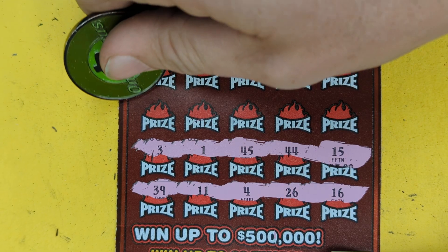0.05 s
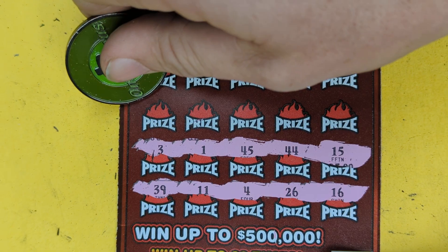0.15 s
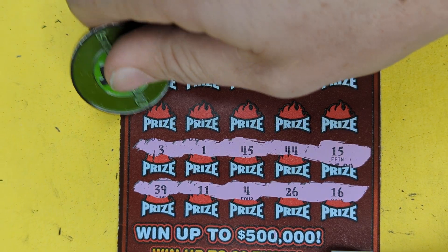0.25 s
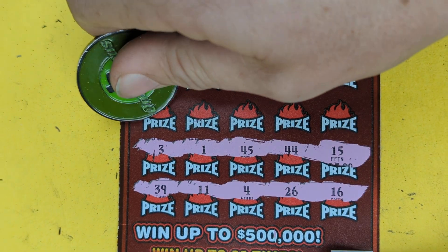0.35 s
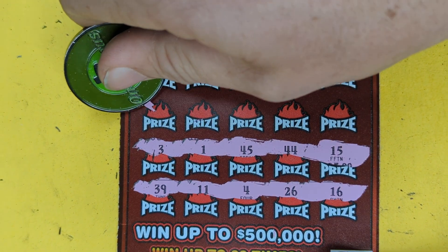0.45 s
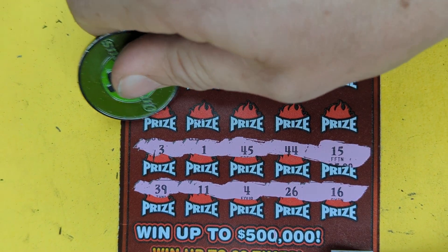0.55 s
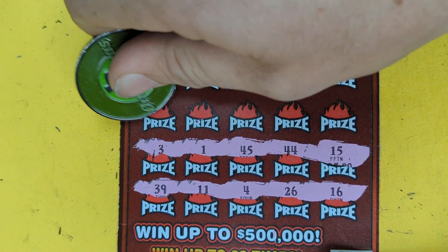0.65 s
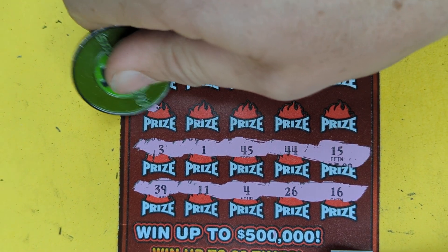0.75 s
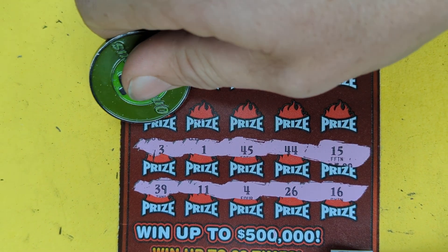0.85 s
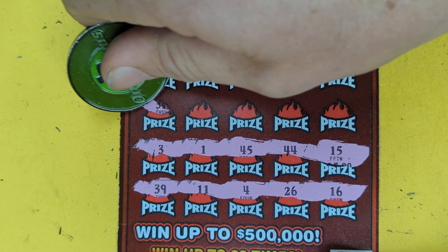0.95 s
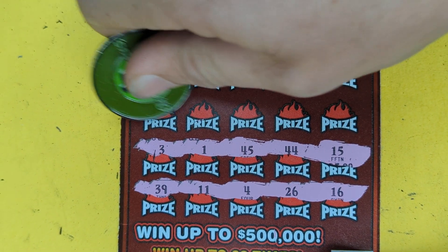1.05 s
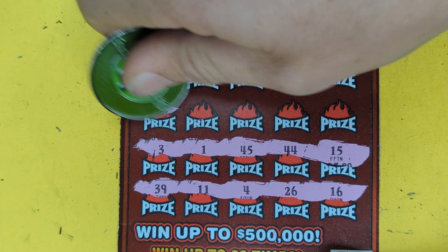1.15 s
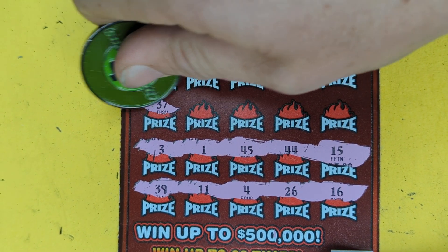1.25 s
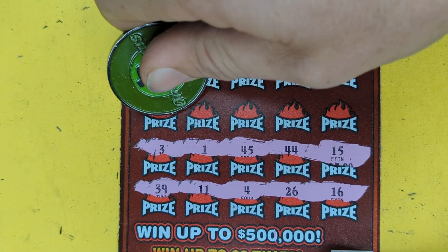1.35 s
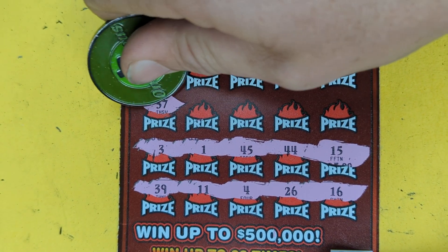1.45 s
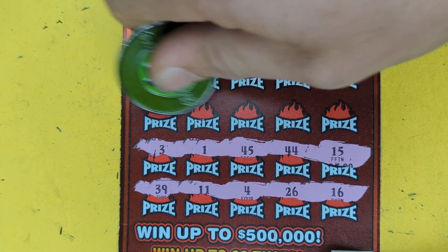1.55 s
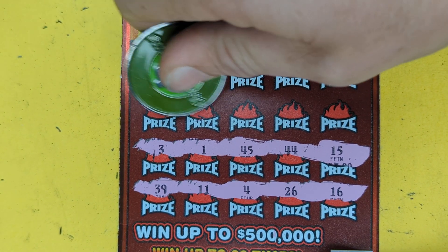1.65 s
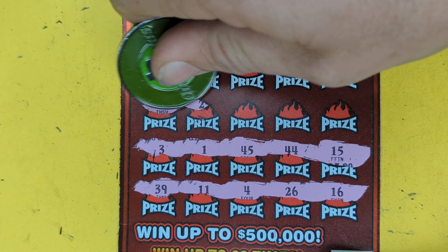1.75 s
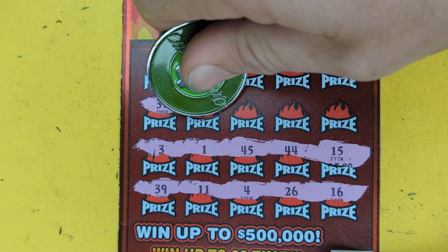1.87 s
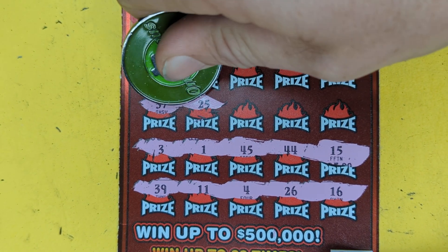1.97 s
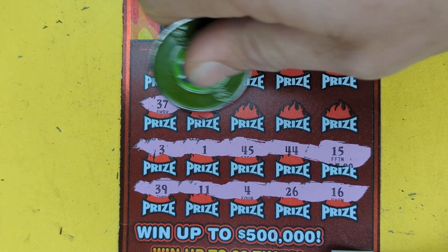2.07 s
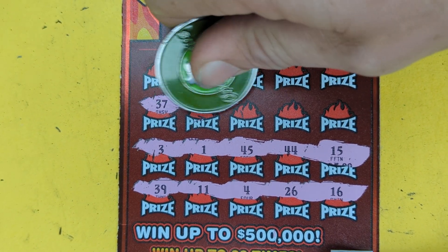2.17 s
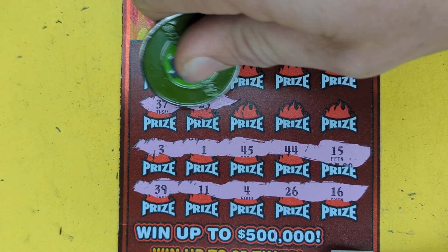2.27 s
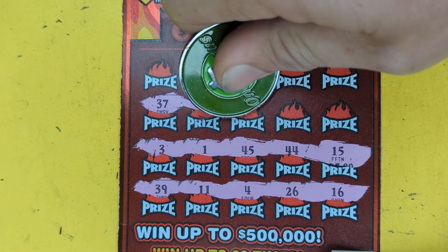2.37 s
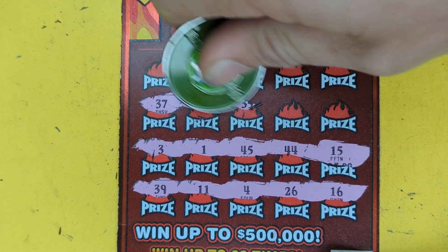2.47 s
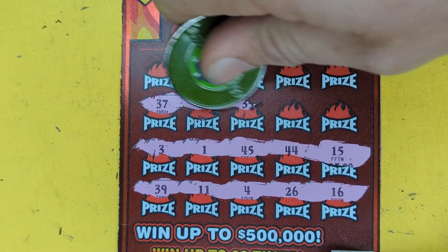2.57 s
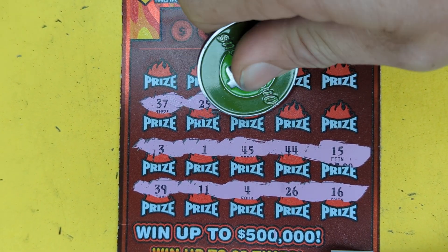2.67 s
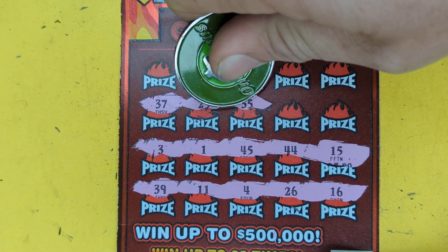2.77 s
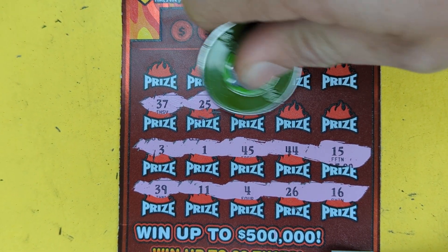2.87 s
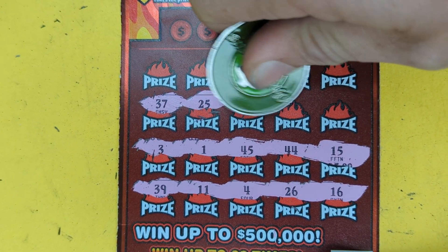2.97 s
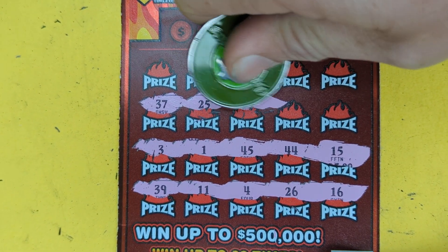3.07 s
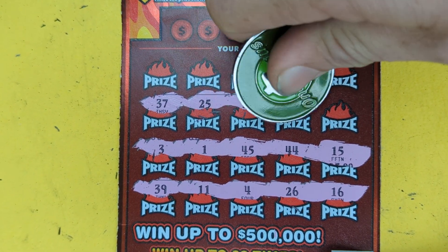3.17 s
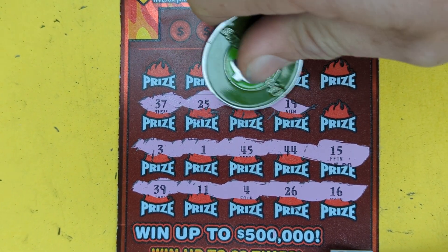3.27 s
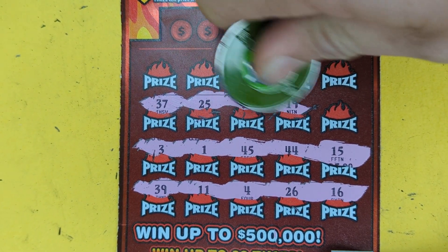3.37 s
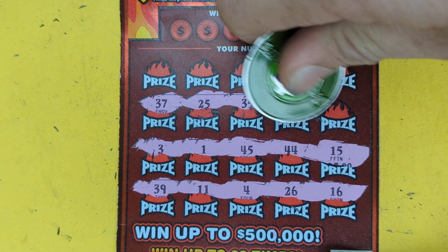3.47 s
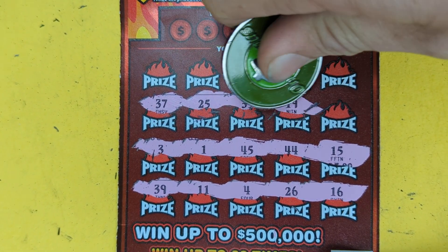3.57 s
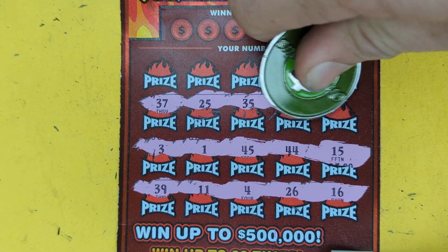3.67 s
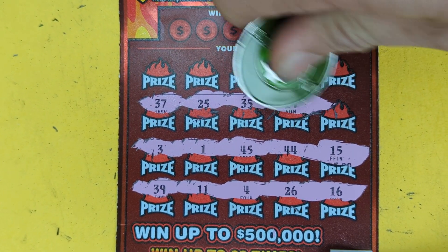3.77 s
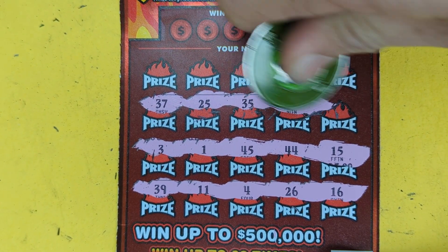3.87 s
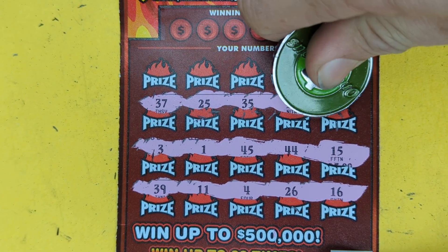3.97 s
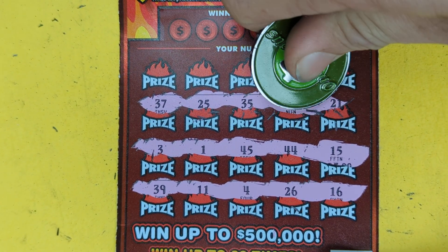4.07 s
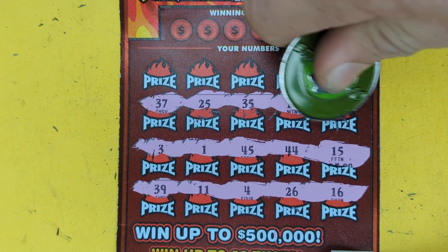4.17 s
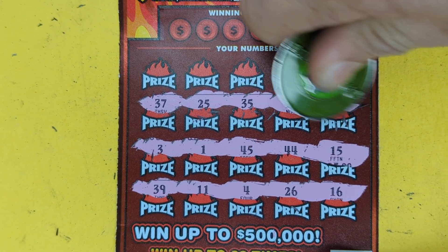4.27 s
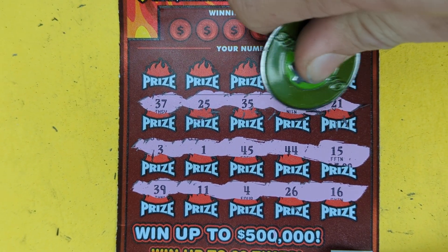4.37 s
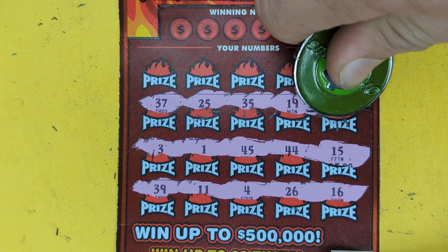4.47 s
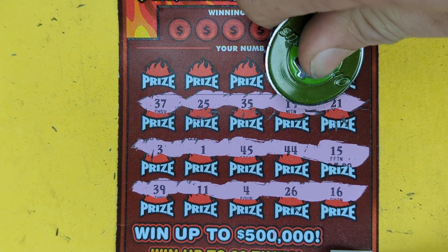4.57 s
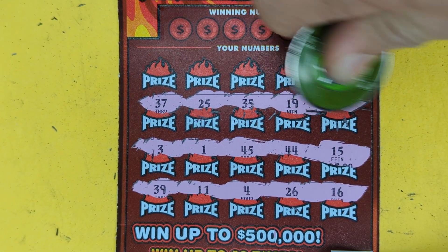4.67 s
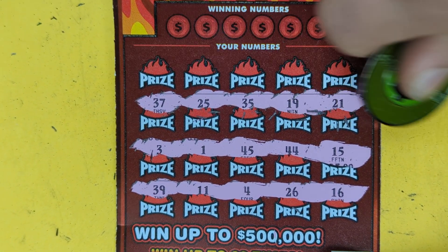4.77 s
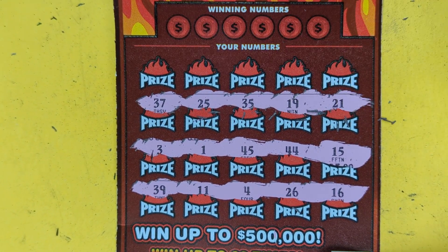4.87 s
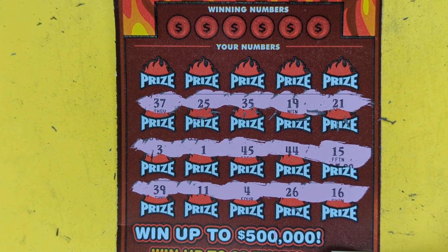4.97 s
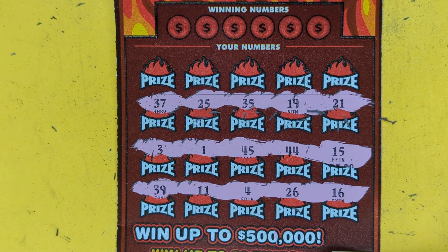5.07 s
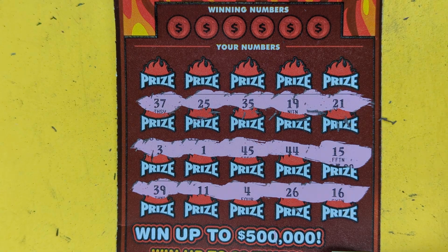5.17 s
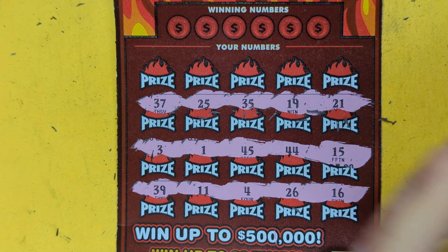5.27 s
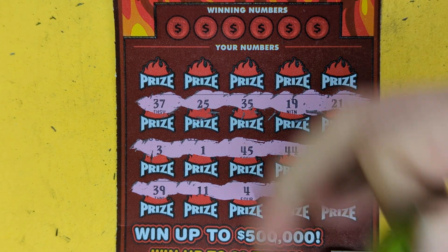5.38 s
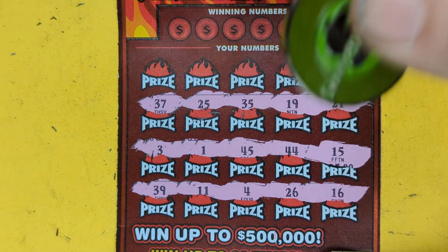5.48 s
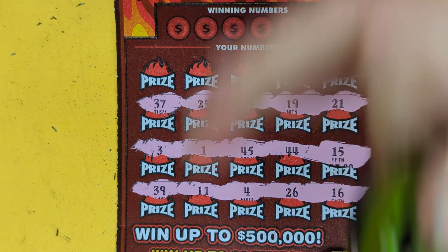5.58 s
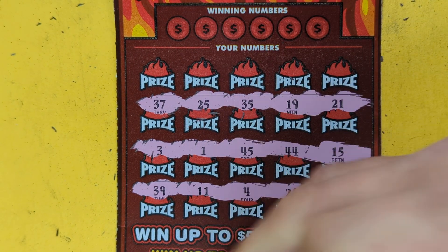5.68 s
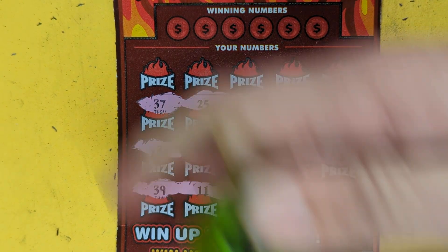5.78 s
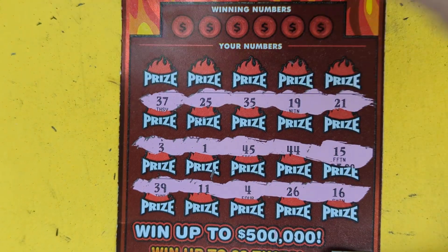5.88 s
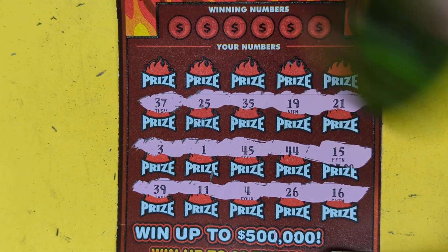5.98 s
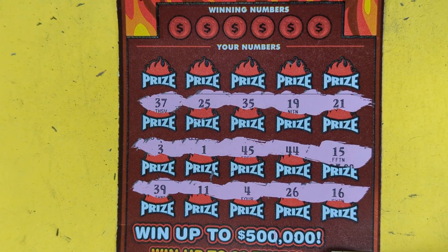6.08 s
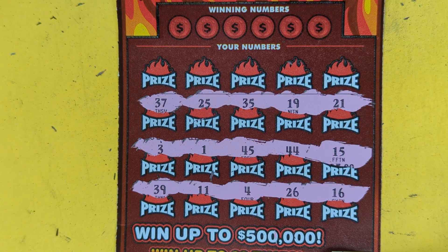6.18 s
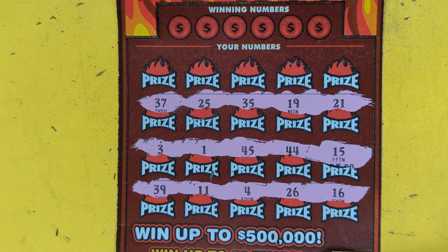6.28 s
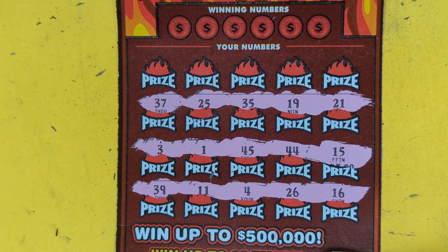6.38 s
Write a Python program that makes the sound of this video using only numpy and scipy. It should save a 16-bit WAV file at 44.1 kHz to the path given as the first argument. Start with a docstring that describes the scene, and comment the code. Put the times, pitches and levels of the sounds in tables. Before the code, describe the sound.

A coin-like disc scrapes the coating off a scratch ticket on a table in quick, gritty back-and-forth strokes. The rasp grows brighter as the disc tilts onto its rim, with a few sharp ticks and soft knocks on the table. The scratching stops, and a hand slides off and sweeps the crumbs away twice. It is heard close up in a small quiet room.

```python
"""A coin-like chip scrapes the coating off a scratch ticket on a table, about eight strokes a second.
Flakes break away in dense tiny snaps that ring chip, card and table. As the chip tilts up on its rim
it turns brighter and ticks between strokes; hand and chip knock softly on the table. Then the hand
slides off and twice sweeps the crumbs away. Heard close under a phone in a small quiet room."""
import sys
import numpy as np
from scipy import signal
from scipy.fft import rfft, irfft, next_fast_len
from scipy.io import wavfile
from scipy.ndimage import map_coordinates

SR = 44100
rng = np.random.default_rng(int(sys.argv[2]) if len(sys.argv) > 2 else 0)


def wrap_up_sound(samples):
    """Save the sound to the file named by the first command line argument, as 16-bit audio."""
    columns = np.atleast_2d(samples).T
    # keep every value between -1 and 1, then stretch to whole-number steps
    tamed = np.clip(columns, -1, 1)
    steps = np.round(tamed * 32767).astype(np.int16)
    wavfile.write(sys.argv[1], SR, steps)


N = 283563
T = np.arange(N) / SR
FFT_SIZE = 2 * next_fast_len(N // 2 + SR // 2)
HZ = np.maximum(np.arange(FFT_SIZE // 2 + 1) * SR / FFT_SIZE, 1)
SIDES = np.array([[1], [-1]])  # left, right

# Chip strokes, long push and short pull in turn. Each row: start in seconds, length in seconds, rasp in dB.
STROKES = [(0.274, 0.11, -46), (0.424, 0.065, -32.5), (0.575, 0.058, -37), (0.697, 0.056, -42.5),
           (0.794, 0.082, -39.5), (0.94, 0.075, -37.5), (1.05, 0.087, -37), (1.185, 0.082, -35),
           (1.296, 0.11, -36), (1.441, .073, -37.5), (1.548, 0.12, -34), (1.697, 0.066, -34.5),
           (1.807, 0.1, -36), (1.945, 0.081, -33), (2.06, .117, -36), (2.23, 0.063, -37),
           (2.328, 0.11, -33.5), (2.478, 0.08, -35), (2.597, 0.11, -33.5), (2.737, 0.077, -33),
           (2.862, 0.11, -35), (3.015, 0.07, -38), (3.112, 0.12, -35), (3.252, .087, -34),
           (3.389, .11, -34), (3.518, 0.071, -33), (3.633, .119, -35.5), (3.788, .074, -35.5),
           (3.892, .107, -35.5), (4.048, 0.074, -38.5), (4.175, 0.082, -34), (4.299, 0.082, -41.5),
           (4.416, 0.1, -36), (4.572, 0.053, -34.5), (4.677, 0.094, -34)]


def amp(db):
    """Decibels to gain."""
    return 10 ** (np.asarray(db) / 20)


def shape(points):
    """Gain at every frequency from (Hz, dB) points."""
    hz, db = np.transpose(points)
    return amp(np.interp(np.log(HZ), np.log(hz), db))


def unit(x):
    """Scale to rms 1."""
    return x / np.sqrt(np.mean(np.abs(x) ** 2))


def below(hz):
    """Steep low-pass gain."""
    return 1 / np.sqrt(1 + (HZ / hz) ** 8)


def above(hz):
    """Steep high-pass gain."""
    return np.sqrt(1 - below(hz) ** 2)


def through(x, gain):
    """Minimum-phase filter: rings after a blow, never before."""
    cepstrum = irfft(np.log(gain + 1e-5))
    cepstrum[1:FFT_SIZE // 2] *= 2
    cepstrum[FFT_SIZE // 2 + 1:] = 0
    return irfft(rfft(x, FFT_SIZE) * np.exp(rfft(cepstrum)))[..., :N]


def wander(rate_hz):
    """Smooth random drift, spread near 1."""
    return np.interp(T * rate_hz, np.arange(N), rng.standard_normal(N))


def snaps(per_s, spread_db, smooth):
    """Dense snaps of unequal size over a smooth rub; rms 1."""
    sizes = amp(spread_db * np.minimum(rng.exponential(size=N), 5))
    clicks = (rng.random(N) < per_s / SR) * sizes * rng.choice([-1, 1], N)
    return unit(unit(clicks) + smooth * rng.standard_normal(N))


def contact(per_s, spread_db, smooth, apart):
    """Stereo snaps; apart is the power share each microphone port gets from its own part of the card."""
    common, *own = (snaps(per_s, spread_db, smooth) for _ in range(3))
    return np.sqrt(1 - apart) * common + np.sqrt(apart) * np.array(own)


def ports(pair, lag_s):
    """The right microphone port hears the card just after the left."""
    return np.array([pair[0], map_coordinates(pair[1], [(T - lag_s) * SR], order=3)])


def room_air(level_db=-51):
    """Low steady room rumble, alike at both ports in the bass."""
    # Rumble spectrum. Each row: frequency in Hz, level in dB.
    rumble = [(30, -2), (71, 7), (245, -5.5), (345, -1), (600, -18), (900, -20), (1700, -22.5), (3200, -30),
              (7500, -42), (12000, -43.5), (16000, -59)]
    colour = unit(shape(rumble))
    common = through(rng.standard_normal(N) * amp(0.37 * wander(6)), colour)
    apart = through(rng.standard_normal(N), colour * np.clip(HZ / 1100, 0.23, 1))
    return amp(level_db) * (common + SIDES * apart)


def slide_force(slides, touch_s=0.023):
    """Hiss and rub envelopes: the hand touches down, reaches top speed, slows and lifts."""
    hiss, rub = np.zeros((2, N))
    for start, fastest, end, hiss_db, rub_db, swell_db in slides:
        touching = np.clip(np.minimum(T - start, end - T) / touch_s, 0, 1)
        force = touching * amp(hiss_db - swell_db * np.interp(T, [start, fastest, end], [1, 0, 1]))
        hiss = np.hypot(hiss, force)
        rub = np.hypot(rub, force * amp(rub_db))
    return hiss, rub


def sliding_hand(slides, colour):
    """Skin on card: fine hiss from a broad patch, lower rub when it presses."""
    # Hand position. Each row: time in seconds, left minus right in dB.
    hand_side = [(0, 8), (.4, 1), (4.75, 7.5), (5.1, -7.5), (5.48, 4), (5.88, 3.5), (6.15, -1), (6.4, -11)]
    hiss_force, rub_force = slide_force(slides)
    skin = np.array([snaps(9000, 2.0, 0.49) for _ in SIDES]) * amp(1.93 * wander(110))
    blended = skin + 0.5 * skin[::-1]
    hiss = through(skin * hiss_force * amp(2.5), unit(shape(colour) * above(1880)))
    rub = through(blended * rub_force * amp(-2.5), unit(shape(colour) * above(226) * below(2240)))
    side_db = np.interp(T, *np.transpose(hand_side))
    return (hiss + rub) * amp(SIDES * side_db / 2)


def settling_hand():
    """The hand settles on the card, then trails beside the chip."""
    # Slides. Each row: start, fastest moment and end in seconds; hiss, rub over hiss and swell in dB.
    slides = [(-0.02, 0.097, 0.355, -54.5, 6, 6.5), (0.52, 0.63, 0.66, -71.5, 12, 12),
              (0.88, 1.15, 1.42, -72, 6, 5)]
    # Slide spectrum. Each row: frequency in Hz, level in dB.
    colour = [(240, -68), (400, -34), (570, -4), (964, -9), (1160, -5), (1870, -4), (3810, -20),
              (3990, -19), (10100, -22), (16000, -34)]
    return sliding_hand(slides, colour)


def blows(times_s, levels_db, decay_s):
    """Short contacts: a sharp snap that crumbles away."""
    force = np.zeros(N)
    for start, db in zip(times_s, levels_db):
        force += amp(db) * (T >= start) * np.exp(-np.abs(T - start) / decay_s)
    return force * unit(np.tanh(contact(9000, 0.95, 2.0, apart=0.48)))  # the soft card caps each snap


def ticks():
    """Rim or nail catches on the card: a bright crack over a low thock."""
    # Hard catches. Each row: time in seconds, level in dB, low body over that level in dB.
    catches = [(0.094, -42, -11), (0.345, -41.5, -11), (1.286, -51, -7), (3.159, -28, -11),
               (3.453, -22.5, -6), (4.352, -44, 6), (4.385, -41.5, -0.5), (4.593, -24, -3),
               (4.6287, -40.5, 0), (4.725, -23.5, -22), (5.4828, -24.5, -8.5), (5.5678, -34.5, 0),
               (5.8658, -27, 3), (5.982, -38, 2), (6.326, -38.5, -14), (6.4224, -35.5, -20)]
    # Catch spectrum. Each row: frequency in Hz, level in dB.
    catch_colour = [(300, -3.5), (1000, -9), (2300, 5), (4500, 3.5), (8000, -7), (12000, -10.5),
                    (16000, -21)]
    colour = shape(catch_colour)
    times_s, db, body_db = np.transpose(catches + rocking())
    crack = through(blows(times_s, db + 1.0, decay_s=0.0025), unit(colour * above(1500)))
    thock_force = blows(times_s, db + body_db - 0.5, decay_s=0.005)
    thock = through(thock_force, unit(colour * above(420) * below(1670)))
    return ports(crack + thock, lag_s=0.0001) * amp(SIDES * 2.1)


def chip_hold(times_s):
    """Chip tilt and left minus right dB at the given times."""
    # Grip. Each row: time in seconds, tilt from 0 (flat) to 1 (on the rim), left minus right in dB.
    grip = [(0.3, 0, 2), (1.4, 0.01, 0), (2.6, 0.3, -2), (3.3, 0.9, -0.5), (4.7, 0.85, -0.5)]
    grip_s, tilt, side_db = np.transpose(grip)
    return np.interp(times_s, grip_s, tilt), np.interp(times_s, grip_s, side_db)


def stroke_levels(dig_in_db=-10.5, dig_in_s=0.11):
    """Rasp, treble, drone dB per stroke: the rim is brighter and shakes the table less; pulls are lighter."""
    start, _, rasp_db = np.transpose(STROKES)
    tilt, _ = chip_hold(start)
    pull = np.arange(len(start)) % 2
    skating = np.exp(-(start - start[0]) / dig_in_s)  # at first the edge skates and breaks few flakes
    treble_db = rasp_db - 4.5 + 7 * tilt - 3 * pull + dig_in_db * skating
    drone_db = -38.5 + 0.26 * (rasp_db - rasp_db.mean()) - 2 * tilt - 4.5 * pull
    return rasp_db, treble_db, drone_db


def stroke_force(levels_db, steepness, bite=0.12, jerk_s=0.003, fastest_share=0.42):
    """The chip jerks free, speeds up, slows and turns; sound grows as a power of its speed."""
    force = np.zeros(N)
    for (start, length, _), db in zip(STROKES, levels_db):
        span = (T > start - jerk_s) & (T < start + length)
        stages_s = [-jerk_s, jerk_s, fastest_share * length, length]
        progress = np.interp(T[span] - start, stages_s, [0, bite, 0.5, 1])
        force[span] += amp(db) * np.abs(np.sin(np.pi * progress)) ** steepness
    return force


def hand_reflection(sound, delay_s=0.000809, echo_db=-11.5, spread=0.32):
    """The hand reflects the scrape from a new distance each stroke, so each has its own colour."""
    start, length, _ = np.transpose(STROKES)
    delays_s = delay_s * np.exp(spread * rng.standard_normal(len(start)))
    edges_s = np.column_stack([start, start + length]).ravel()
    late_s = T - np.interp(T, edges_s, np.repeat(delays_s, 2))
    echo = np.array([map_coordinates(side, [late_s * SR], order=3) for side in sound])
    return (sound + amp(echo_db) * echo) / np.hypot(1, amp(echo_db))


def scratching():
    """Breaking flakes ring chip and card; treble needs the most speed, the table drones through turns."""
    # Scrape spectra, chip flat and on its rim. Each row: frequency in Hz, level in dB.
    flat_colour = [(41, -60), (70, -2), (314, -3.5), (529, -7.5), (815, -2), (1000, -6), (1150, -4.5),
                   (1410, -13.5), (1540, -10.5), (2320, -14.5), (2660, -12), (3040, -17.5), (11400, -27.5),
                   (16000, -33)]
    rim_colour = [(41, -33), (70, 2.5), (218, -9), (286, -2.5), (403, -8), (579, 1.5), (1120, -5.5),
                  (1370, -6), (2720, -6.5), (2980, -11), (4380, -11), (6200, -14.5), (7100, -18.5),
                  (9930, -17), (12700, -26.5), (16000, -25)]
    # Resonances of table, chip and card. Each row: frequency in Hz, width in Hz, lift in dB.
    resonances = [(327, 55, 4), (580, 50, 3), (840, 110, 1), (1118, 65, 7), (1525, 65, 6), (2035, 80, 2),
                  (2665, 100, 7), (2815, 80, 4), (3455, 60, 3), (3970, 90, 5), (4445, 80, 10),
                  (5135, 55, 5), (5778, 90, 5), (5965, 60, 6), (6280, 300, 2), (8715, 180, 2),
                  (9885, 140, 2), (11200, 200, 3)]
    # Bias to the nearer, left port. Each row: frequency in Hz, left minus right in dB.
    near_left = [(100, 3.5), (350, 3.5), (650, 8.5), (1000, 11.5), (1350, 5), (2000, -0.5), (2700, 8.5),
                 (3300, 3.5), (5500, 7), (12000, 0.9)]
    rasp_db, treble_db, drone_db = stroke_levels()
    tilt, side_db = chip_hold(T)
    peaks = sum(amp(db) ** 2 / (1 + (2 * (HZ - hz) / width) ** 2) for hz, width, db in resonances)
    ringing = np.sqrt(1 + peaks)

    def body(force, band):
        flat, on_rim = (unit(shape(colour) * ringing * band) for colour in (flat_colour, rim_colour))
        return through(force * (1 - tilt), flat) + through(force * tilt, on_rim)

    stick_slip = amp(1.65 * wander(190))
    bumps = contact(1200, 2.9, 0.36, apart=0.031) * stroke_force(drone_db, steepness=0.66)
    scrapes = contact(3200, 2.1, 0.66, apart=0.18) * stroke_force(rasp_db + 0.68, steepness=1.225)
    flakes = contact(7000, 3.6, 0.38, apart=1.0) * stroke_force(treble_db + 0.61, steepness=2.0)
    drone = body(bumps, above(57.6) * below(513))
    rasp = body(scrapes * stick_slip, above(558) * below(2080))
    treble = body(flakes * stick_slip, above(1710))
    sound = drone + hand_reflection(rasp + treble)
    left, right = ports(sound, lag_s=0.00012) * amp(SIDES * side_db / 2)
    bias = shape(near_left)
    return np.array([through(left, 2 * bias / (1 + bias)), through(right, 2 / (1 + bias))])


def knocks(ring_s=0.2, detune=0.061):
    """Padded blows of hand and chip ring the low, well damped table modes."""
    # Blows. Each row: time in seconds, level in dB.
    thuds = [(0.956, -32), (1.313, -30.5), (1.794, -35.5), (2.375, -22), (3.969, -31), (4.203, -40),
             (4.735, -28.5), (5.721, -33.5), (5.786, -34.5), (5.909, -25.5), (5.972, -31.5), (6.348, -37.5),
             (6.421, -38)]
    # Table modes. Each row: frequency in Hz, level in dB, time to fall 60 dB in seconds.
    table_modes = [(86, -17, 0.13), (171, -3, 0.12), (221, 3, 0.045), (315, 0.5, 0.045), (565, -8, 0.019)]
    sound = np.zeros(N)
    for start, db in thuds:
        span = (T >= start) & (T < start + ring_s)
        age = T[span] - start
        for hz, mode_db, t60_s in table_modes:
            detuned_hz = hz * (1 + detune * rng.standard_normal())
            envelope = amp(db + mode_db - 7.5) * np.exp(-np.log(1000) * age / t60_s)
            sound[span] += envelope * np.sin(2 * np.pi * detuned_hz * age)
    return amp(SIDES * 2.4) * sound


def rocking(min_tilt=0.4, scatter_db=3.5, body_db=-9):
    """The tilted chip tips into each pull with a double tick; returns catch rows for ticks()."""
    # Tick pair. Each row: lead before the pull in seconds, level in dB.
    double_tick = [(0.021, -45), (0.009, -48.5)]
    pulls_s = np.array(STROKES)[1::2, 0]
    tilts, _ = chip_hold(pulls_s)
    extras_db = scatter_db * rng.standard_normal(len(pulls_s))
    return [(start - lead_s, db + extra_db, body_db)
            for start, tilt, extra_db in zip(pulls_s, tilts, extras_db) if tilt > min_tilt
            for lead_s, db in double_tick]


def sweeping_hand():
    """The hand slides off, then twice sweeps the card."""
    # Slides. Each row: start, fastest moment and end in seconds; hiss, rub over hiss and swell in dB.
    sweeps = [(4.73, 4.79, 4.825, -47.5, 6.5, 4), (4.79, 4.88, 5.38, -57, 1, 6.5),
              (5.35, 5.485, 5.585, -38, -9, 21.5), (5.53, 5.566, 5.588, -50.5, 7, 1.5),
              (5.6, 5.98, 6.33, -54.5, 5.5, 12.5), (5.77, 5.872, 6.0, -33.5, -9.5, 20),
              (6.31, 6.37, 6.46, -57.5, 3.5, -2.5)]
    # Sweep spectrum. Each row: frequency in Hz, level in dB.
    colour = [(240, -36), (400, 1), (626, 0.5), (753, -4), (852, -6), (1230, -5), (1460, -4), (2630, -1),
              (2840, -4), (5270, -4.5), (11000, -8), (16000, -18)]
    return sliding_hand(sweeps, colour)


def dragging_hand(start_s=5.02, end_s=5.175, centre_hz=470, level_db=-48):
    """The heel of the hand judders off the table with a dull, fading rub."""
    force = np.interp(T, [start_s, start_s + 0.0025, end_s], [0, amp(level_db), 0])
    band = unit(above(0.81 * centre_hz) * below(1.38 * centre_hz))
    return through(force * contact(320, 3.7, 0.28, apart=0.36), band)


def room(dry, t60_s, wet_db):
    """Adds faint, short wall reverberation."""
    age = T[:SR // 2]
    tail = rng.standard_normal((2, len(age))) * np.exp(-np.log(1000) * age / t60_s) * (age > 0.006)
    tail /= np.sqrt(np.sum(tail ** 2, axis=1, keepdims=True))
    wall_colour = shape([(200, 10), (1000, -19), (4000, 6.0), (14000, -2)])
    walls = through(signal.fftconvolve(dry, tail, axes=1)[:, :N], wall_colour)
    return dry + amp(wet_db) * walls


def scene():
    """Chip, hand and table in the room."""
    hand = settling_hand() + sweeping_hand() + dragging_hand()
    return room(scratching() + hand + ticks() + knocks(), t60_s=0.11, wet_db=-22.5) + room_air()


def record(dry):
    """The phone drops the deepest bass and cuts the top."""
    bass_hz, top_hz = 48, 15950
    bass_cut = signal.butter(4, bass_hz, "highpass", fs=SR, output="sos")
    top_cut = signal.ellip(12, 0.1, 80, top_hz, fs=SR, output="sos")
    return signal.sosfilt(np.vstack([bass_cut, top_cut]), dry)


dry = scene()
out = record(dry)
wrap_up_sound(out)
```